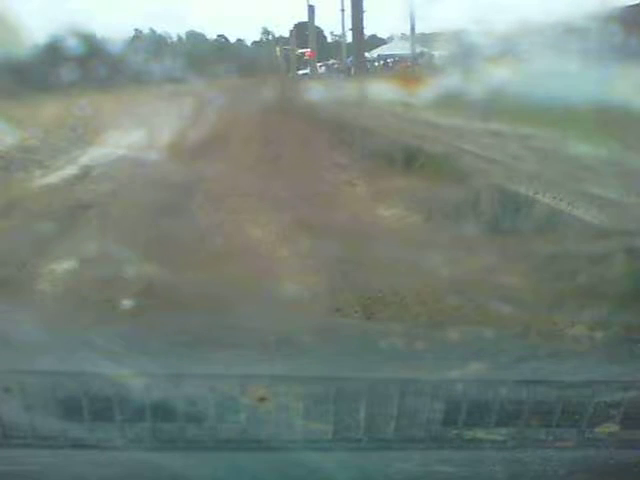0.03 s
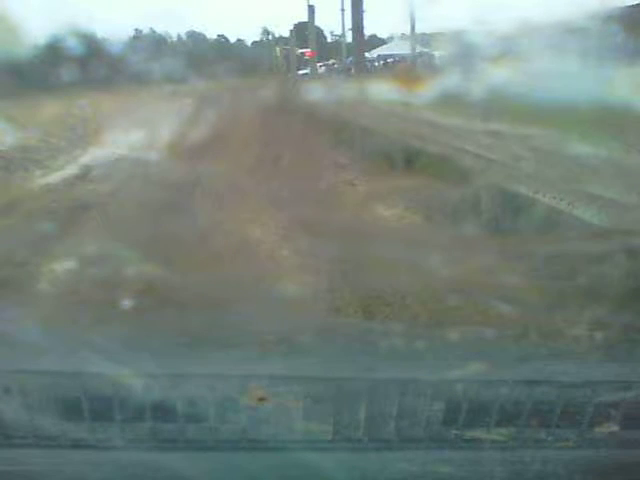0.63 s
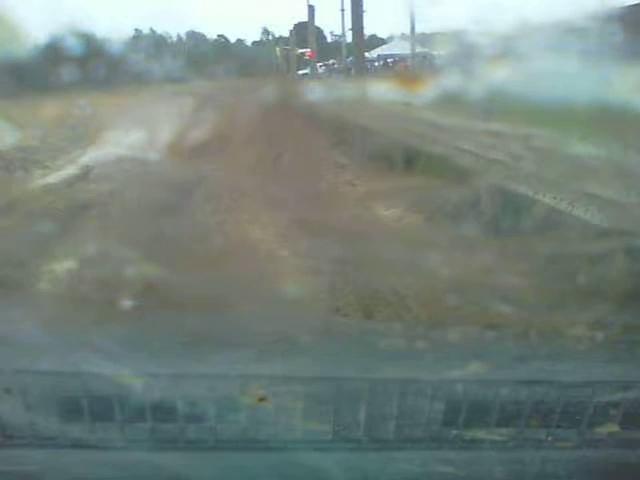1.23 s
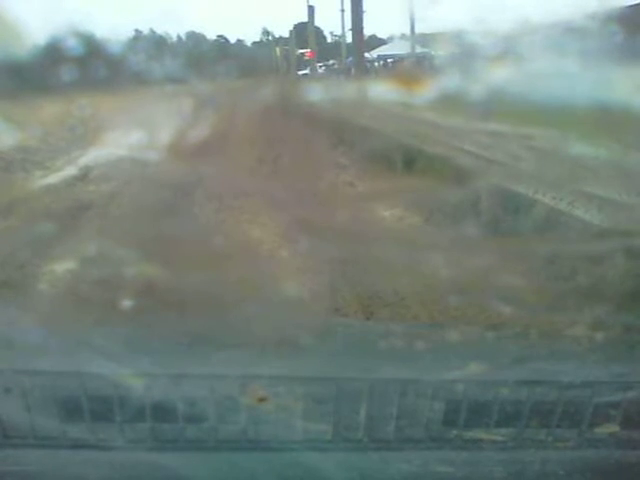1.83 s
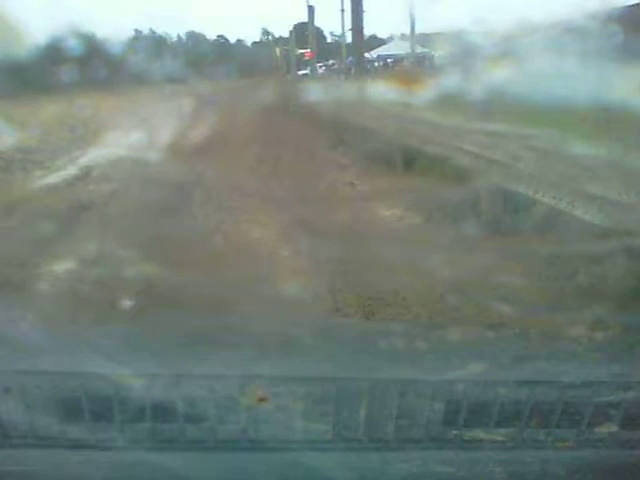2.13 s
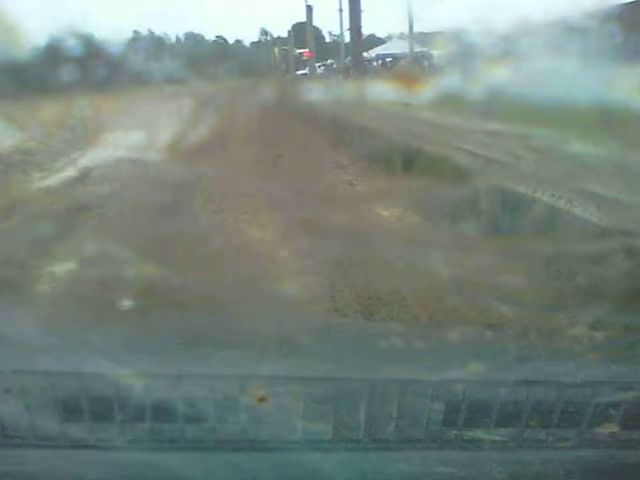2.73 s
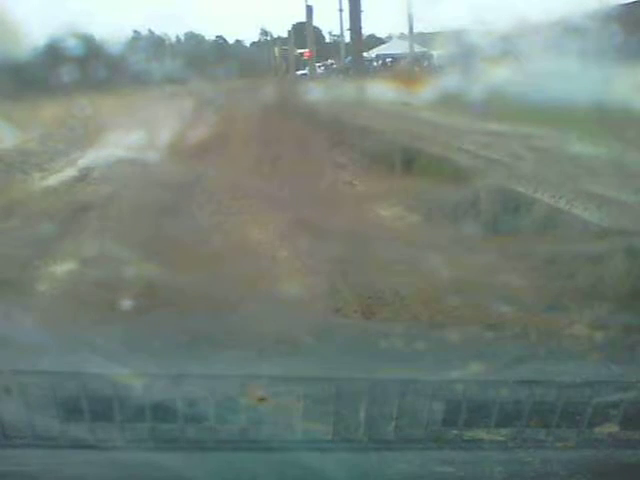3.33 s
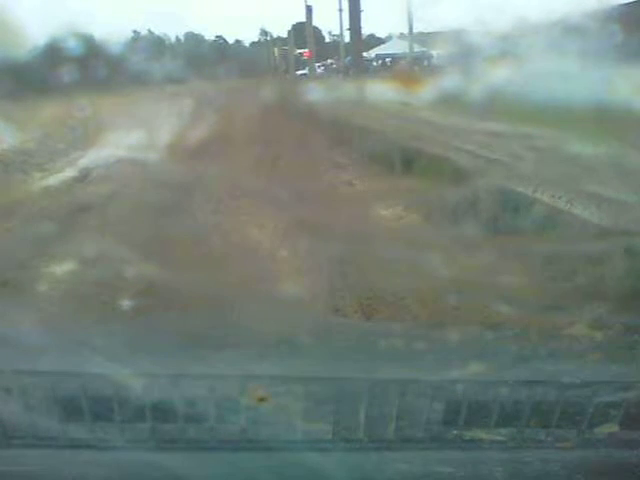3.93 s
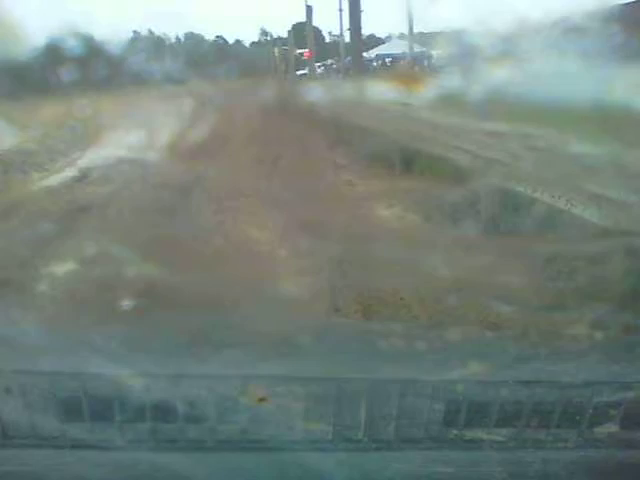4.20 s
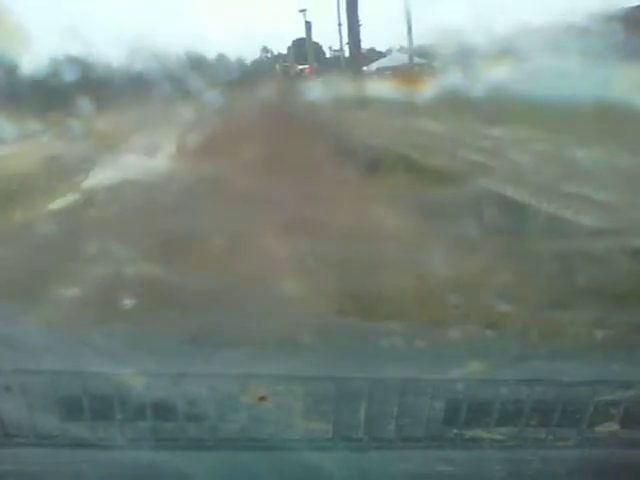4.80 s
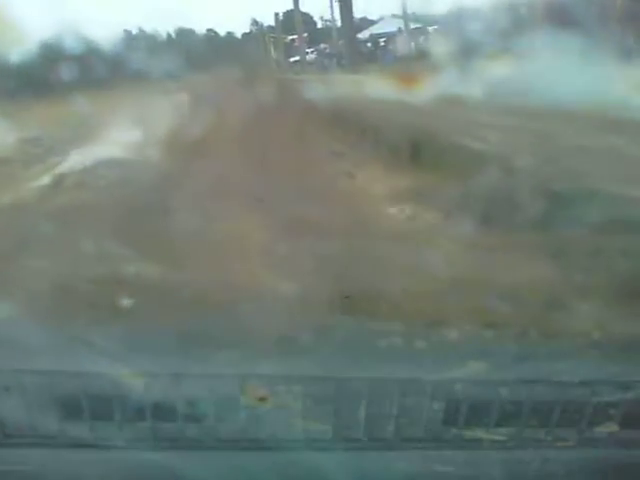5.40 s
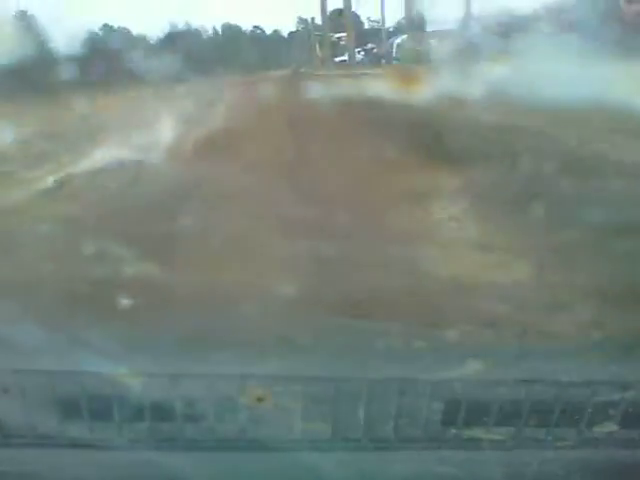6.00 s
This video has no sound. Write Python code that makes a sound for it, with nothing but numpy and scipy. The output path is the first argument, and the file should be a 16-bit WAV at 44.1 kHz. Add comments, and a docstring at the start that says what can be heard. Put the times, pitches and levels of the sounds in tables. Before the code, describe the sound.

From the start, a loud engine throbs inside a car, with a deep boom, clatter and a little hiss, heard through a small, dull-sounding dashboard microphone. Something scuffs the camera's housing at about 1 second. Around 1.3 seconds a quick cluster of hard knocks hits it, clipping and cracking; this is the loudest moment. At 1.4 seconds the roar stops dead, leaving a brief low shudder.

Until about 4.5 seconds there is only a very quiet idle hum and low rumble, with a barely audible electronic whine and hiss. Between 4.4 and 4.8 seconds the interior trim ticks and creaks softly as the car pulls away. Engine growl and gear tones climb in pitch, swelling near 5.4 seconds, while tyre rumble and a light spray of mud grow louder and brighter until the end at about 6 seconds, staying well below the opening roar.

```python
"""Inside a car on a muddy track, a small dashboard camera hears the engine's orders throb in the cabin
until knocks excite the modes of its housing and overload its input. The sound cuts off; a faint idle
hum and the camera's own electronic whine remain. The car then pulls away: drive-line tones climb with
shaft speed through the cabin's resonances, the trim ticks and the tyres rumble louder and brighter."""
import sys
import numpy as np
from scipy.fft import rfft, irfft, next_fast_len
from scipy.io import wavfile
from scipy.ndimage import map_coordinates

SR = 44100
rng = np.random.default_rng(int(sys.argv[2]) if len(sys.argv) > 2 else 0)


def store_pcm(level_fs):
    """Save levels as 16-bit WAV."""
    pcm = np.round(np.clip(level_fs, -1, 1) * 32767).astype(np.int16)
    wavfile.write(sys.argv[1], SR, np.atleast_2d(pcm).T)


N = 271215
TIME = np.arange(N) / SR

# Noise spectra, each giving a shape only: frequency_hz, relative_density_db
CIRCUIT_SPECTRUM = [(100, -18.5), (300, 0.5), (600, -0.5), (1000, -1.5), (2000, -1), (3200, -1.5),
                    (4500, -1.5), (5300, -5.5), (6000, -11), (7000, -51.5)]
RUMBLE_SPECTRUM = [(10, -8.5), (22, 1.5), (40, -3.5), (58, 2), (80, -5), (110, -10.5), (150, -16.5),
                   (220, -23.5), (400, -47), (900, -120)]
TYRE_SPECTRUM = [(30, -40), (80, -16), (140, 6), (220, -2), (330, 1), (450, -7), (620, -9), (850, -15.5),
                 (1300, -22), (2000, -34), (4000, -57.5), (7000, -100)]
SPRAY_SPECTRUM = [(200, -50), (600, -3), (1200, 1.5), (1600, -7), (2300, -6.5), (3000, -6.5), (4000, -19),
                  (5200, -18.5), (6500, -44)]
CABIN_SPECTRUM = [(12, -26.5), (35, -1), (65, 0.5), (105, -6.5), (150, -11.5), (200, -17.5), (300, -22),
                  (450, -40), (1200, -120)]
CLATTER_SPECTRUM = [(30, -60), (120, -21), (220, 2), (320, 2), (420, -2), (500, -6.5), (700, -6.5),
                    (870, -5.5), (1100, -12), (1400, -16.5), (1700, -18), (2200, -24.5), (4000, -37.5),
                    (7000, -77)]
ENGINE_HISS_SPECTRUM = [(300, -52), (900, -18.5), (2000, -5), (2550, 4), (3100, 2.5), (3800, -2.5),
                        (4600, -2.5), (5300, -6.5), (6000, -13.5), (8000, -70)]
# Tones of the camera's electronics: pitch_hz, level_db
WHINE_TONES = [(1200, -80), (1502, -86.5), (2202, -79), (4000, -87), (4048, -80), (4597, -83), (5426, -92)]
# Second harmonic of the idle hum: time_s, pitch_hz, level_db
IDLE_HUM = [(1.75, 183.1, -84), (2.13, 174.8, -95), (2.45, 180.3, -65), (2.69, 181.5, -69),
            (2.81, 177.9, -65), (2.94, 172.8, -78), (3.39, 183.9, -71), (3.88, 179.6, -71),
            (4.45, 183.5, -64)]
# Vibration of the idling body: time_s, pitch_hz, level_db
BODY_SHAKE = [(1.7, 46.3, -64), (2.07, 46.5, -60), (2.42, 61.3, -63), (3.17, 54.2, -72), (3.2, 54.7, -60),
              (3.96, 54.1, -55), (4.25, 60.7, -67), (4.5, 61.3, -55)]
# Ticks and creaks of the trim: start_s, level_db, pitch_hz, width_hz, t60_s
TRIM_TICKS = [(1.378, -58, 400, 900, .2), (4.415, -62, 1870, 1800, .2), (4.446, -55.5, 1300, 5000, 0.064),
              (4.45, -62, 430, 400, .12), (4.5, -54, 3690, 299, 0.041), (4.522, -52, 240, 120, .14),
              (4.575, -59, 3005, 5000, .04), (4.659, -57, 1790, 6010, 0.068), (4.77, -52, 1100, 600, .13),
              (4.788, -52.5, 1490, 160, .13), (4.804, -53, 1900, 3000, 0.06)]
# Shaft speed as the car pulls away: time_s, rotation_hz
SHAFT_SPEED = [(4.5, 26), (4.57, 27.6), (4.77, 40.1), (5.0, 47.2), (5.44, 61.1), (5.68, 73.5), (6.0, 93),
               (6.15, 102)]
# Shaft and gear tones: shaft_multiple, base_level_db, growth_db_per_hz
GEAR_ORDERS = [(1, -51.3, .07), (2, -59, -.02), (2.5, -62, .02), (3, -56.5, -.03), (4.8, -63, .15),
               (6.66, -67.3, .13)]
# Cabin resonances that lift a passing tone: centre_hz, width_hz, lift_db
CABIN_MODES = [(60, 14, 4), (78, 14, 6), (116, 12, 6), (141, 16, 8), (290, 60, 5), (620, 80, 6.5)]
# Tones of the loud engine: crank_multiple, relative_level_db
CRANK_ORDERS = [(1, -10), (2, 0), (3.17, -5.5), (4, -5.5), (4.6, -11.5), (6, -19), (7, -18), (8, -21),
                (12, -26), (14, -27)]
# Engine-bay resonances, a rasp and a honk: centre_hz, width_hz, rest_db, swell_db, peak_s, half_width_s
BAY_RESONANCES = [(1750, 500, -64, -46.8, .51, .25), (860, 260, -54.5, -51, 1.0, .22)]
# Modes of the camera's housing: pitch_hz, gain_db, t60_s
HOUSING_MODES = [(12.5, 0, .17), (40, 1.3, .115), (62, 3, .055), (165, 1, .09), (300, -5, .055),
                 (420, .5, .05)]
# Scuffs on the housing: start_s, level_db, t60_s
HOUSING_SCUFFS = [(.102, -38, 0.13), (0.397, -35.5, 0.027), (.9705, -22, 0.066), (1.1, -40.5, 0.1),
                  (1.161, -42, 0.2), (1.2, -41, .2), (1.228, -14.5, 0.082), (1.274, -10.5, 0.16),
                  (1.321, -26.5, 0.077), (1.351, -29, .056)]
# Knocks on the housing: start_s, strength_db, contact_hz
HOUSING_KNOCKS = [(1.248, 5, 10), (1.2733, 13, 227), (1.2944, 4.5, 85), (1.312, 9, 42), (1.335, 5.5, 15),
                  (1.357, 1, 44)]
# Jumps of the overloaded input: start_s, jump_db
OVERLOAD_CRACKS = [(1.2722, -7), (1.278, 1), (1.2784, 0.5), (1.2787, 3), (1.2905, -19), (1.2969, 0.5),
                   (1.2975, 0), (1.2995, 0), (1.3224, 2)]
# Treble response of the overloaded input: frequency_hz, gain_db
OVERLOAD_TREBLE = [(5500, 0), (8000, -4.5), (10500, -.5), (13000, -2)]

DROPOUT_START_S, DROPOUT_END_S, CUT_S = 1.306, 1.3175, 1.3705
CRANK_HZ = 22.77
REFERENCE_HZ = 60  # shaft speed at which the moving car's base levels hold
STRAIN = dict(peak_s=5.37, half_width_s=.13, height=3.5)  # dB swell of the drive tones and rumble
SLUSH = dict(peak_s=5.72, half_width_s=.11, height=2.2)  # dB surge of the tyres in softer mud


def amp(db):
    """Amplitude ratio of a level in decibels."""
    return 10 ** (np.asarray(db) / 20)


def unit(x):
    """Normalisation to rms 1."""
    return x / np.sqrt(np.mean(x ** 2) + 1e-20)


def curves(rows):
    """Linear interpolation of each column over the times in the first."""
    times, *columns = np.transpose(rows)
    return [np.interp(TIME, times, column) for column in columns]


def wobble(knots_per_s):
    """Slow random modulation: a spline through Gaussian values."""
    return map_coordinates(rng.standard_normal(int(N * knots_per_s / SR) + 4), [TIME * knots_per_s])


def swell(peak_s, half_width_s, height):
    """A Gaussian bump in time."""
    return height * np.exp(-((TIME - peak_s) / half_width_s) ** 2)


def ramp(start_s, rise_s):
    """A linear rise from 0 to 1."""
    return np.clip((TIME - start_s) / rise_s, 0, 1)


def gate(start_s, end_s, fade_s):
    """A time window with linear edges."""
    return ramp(start_s, fade_s) * np.clip((end_s - TIME) / fade_s, 0, 1)


def decay(t60_s, attack_s):
    """Exponential damping after a quick rise, a third of a second in all."""
    t = TIME[:SR // 3]
    return np.exp(-np.log(1000) * t / t60_s) * (1 - np.exp(-t / attack_s))


def filtered(x, response):
    """Linear filtering: the spectrum of x times a frequency response."""
    size = next_fast_len(len(x) + 8192)
    return irfft(rfft(x, size) * response(np.fft.rfftfreq(size, 1 / SR)), size)[:len(x)]


def noise(spectrum):
    """White noise shaped by (frequency_hz, relative_density_db) points, at rms 1."""
    hz, db = np.transpose(spectrum)
    white = rng.standard_normal(N)
    return unit(filtered(white, lambda f: amp(np.interp(np.log(f + 1), np.log(hz), db))))


def resonant_noise(hz, width_hz, size=N):
    """Noise through two like resonators in cascade, at rms 1."""
    white = rng.standard_normal(size)
    return unit(filtered(white, lambda f: (1j * f * width_hz / (hz**2 - f**2 + 1j * f * width_hz)) ** 2))


def phase(hz):
    """Phase as the integral of frequency, from a random start."""
    return 2 * np.pi * (np.cumsum(hz) / SR + rng.random())


def partial(angle):
    """A sinusoid with a random phase offset."""
    return np.sin(angle + 2 * np.pi * rng.random())


def add(track, start_s, sound):
    """Superposition of a sound on a track."""
    part = track[round(start_s * SR):][:len(sound)]
    part += sound[:len(part)]


def rolling_gain(shaft_hz, db, db_per_hz):
    """A gain that opens as the car rolls off, its level linear in shaft speed."""
    return ramp(start_s=4.4, rise_s=.2) * amp(db + db_per_hz * (shaft_hz - REFERENCE_HZ))


def electronics():
    """Circuit noise and thin, steady tones form the camera's noise floor."""
    whine = sum(amp(db) * np.sin(phase(hz + .44 * wobble(7.7))) for hz, db in WHINE_TONES)
    return np.sqrt(2) * whine + amp(-70) * noise(CIRCUIT_SPECTRUM)


def idle_rumble():
    """Structure-borne noise of the standing car, rising a little as the idle firms up."""
    softness = 1 - ramp(start_s=2.15, rise_s=.3)
    unsteady = wobble(18)
    rumble = amp(-59.5 - 4 * softness + 1.1 * unsteady) * noise(RUMBLE_SPECTRUM)
    wash = amp(-74 - 9 * softness + 1.4 * unsteady) * noise(TYRE_SPECTRUM)
    return rumble + wash


def faint_idle():
    """Forced vibration at idle: three harmonics, the fundamental swelling with the body's shake."""
    second_hz, second_db = curves(IDLE_HUM)
    shake_hz, shake_db = curves(BODY_SHAKE)
    cycle = phase(second_hz / 2 * (1 + .0037 * wobble(12)))
    hum = amp(shake_db - 8) * np.sin(cycle) + amp(second_db) * np.sin(2 * cycle)
    hum += amp(second_db - 11 + 2.5 * wobble(4)) * np.sin(3 * cycle)
    shake = amp(shake_db + 2 * wobble(12)) * np.sin(phase(shake_hz))
    return np.sqrt(2) * (hum + shake) * gate(1.41, 4.55, fade_s=.087)


def settling(sway_t60_s=.95, shudder_t60_s=.28):
    """Two-slope decay after the cut: a deep sway outlasts a brief shudder."""
    age_s = np.maximum(TIME - CUT_S, 0)
    sway = noise([(8, -21.5), (21, 1.5), (32, -5), (50, -12), (100, -28), (300, -60), (2000, -120)])
    shudder = noise([(15, -20), (45, 0), (100, -8), (180, -18), (350, -34), (900, -60), (2000, -120)])
    return amp(-42 - 60 * age_s / sway_t60_s) * sway + amp(-37 - 60 * age_s / shudder_t60_s) * shudder


def trim():
    """Damped resonances of loose trim: a rattle after the knocks, ticks and creaks on moving off."""
    out = np.zeros(N)
    for start_s, db, hz, width_hz, t60_s in TRIM_TICKS:
        envelope = amp(db) * decay(t60_s, attack_s=.0017)
        add(out, start_s, envelope * resonant_noise(hz, width_hz, len(envelope)))
    return out


def muddy_track():
    """Rolling noise: body rumble, tyre roar and mud spray grow with speed; ruts jolt the first two."""
    shaft_hz, = curves(SHAFT_SPEED)
    ruts = wobble(18)
    strain_db, slush_db = swell(**STRAIN), swell(**SLUSH)
    rumble = rolling_gain(shaft_hz, -44.6 + strain_db + 1.1 * ruts, .15) * noise(RUMBLE_SPECTRUM)
    tyres = rolling_gain(shaft_hz, -55.5 + slush_db + 1.6 * ruts, .18) * noise(TYRE_SPECTRUM)
    spray = rolling_gain(shaft_hz, -65.2 + slush_db + wobble(60), .29) * noise(SPRAY_SPECTRUM)
    return rumble + tyres + spray


def growl(resonance_hz=565, full_load_hz=72):
    """Rough half-orders of the engine sweep through a broad cabin resonance, growing up to full load."""
    shaft_hz, = curves(SHAFT_SPEED)
    shaft = phase(shaft_hz)
    out = np.zeros(N)
    for order in np.arange(6, 26) / 2:
        response = 1 / (1 + (np.log(order * shaft_hz / resonance_hz) / .33) ** 2)
        out += response * amp(3.2 * wobble(13)) * partial(order * shaft + .75 * wobble(25))
    return rolling_gain(np.minimum(shaft_hz, full_load_hz), -65.3, db_per_hz=.65) * out / 2


def drive_line():
    """Shaft and gear orders climb together, each amplified by resonance as it crosses a cabin mode."""
    shaft_hz, = curves(SHAFT_SPEED)
    shaft = phase(shaft_hz * (1 + .007 * wobble(14)))
    out = np.zeros(N)
    for order, base_db, db_per_hz in GEAR_ORDERS:
        lift_db = sum(peak_db / (1 + (2 * (order * shaft_hz - centre_hz) / width_hz) ** 2)
                      for centre_hz, width_hz, peak_db in CABIN_MODES)
        level_db = base_db + lift_db + swell(**STRAIN) + 2.7 * wobble(14)
        out += rolling_gain(shaft_hz, level_db, db_per_hz) * partial(order * shaft)
    return np.sqrt(2) * out


def cabin_drone(pitch_hz=121, sag_hz_per_s=52, hold_s=.135, fade_db_per_s=300):
    """A cabin boom sags in pitch, holding its level briefly before an exponential decay."""
    level_db = -17.7 - fade_db_per_s * np.maximum(TIME - hold_s, 0)
    return amp(level_db) * np.sin(phase(pitch_hz - sag_hz_per_s * TIME))


def loud_engine():
    """Uneven crank orders boom in the cabin; the firings amplitude-modulate the clatter and hiss."""
    crank = phase(CRANK_HZ * (1 + .008 * wobble(9)))
    orders = sum(amp(db + 3.1 * wobble(14)) * partial(order * crank + .2 * wobble(16))
                 for order, db in CRANK_ORDERS)
    boom = amp(-18.8) * unit(orders) + amp(-26.2) * noise(CABIN_SPECTRUM)
    firing = unit(1 + .13 * np.cos(2 * crank) + .065 * np.cos(crank))
    clatter = amp(-37.6 + wobble(40)) * noise(CLATTER_SPECTRUM)
    hiss = amp(-49.5 - 2.4 * TIME + 1.1 * wobble(55)) * noise(ENGINE_HISS_SPECTRUM)
    bay = sum((amp(rest_db) + swell(peak_s, half_width_s, amp(swell_db))) * resonant_noise(hz, width_hz)
              for hz, width_hz, rest_db, swell_db, peak_s, half_width_s in BAY_RESONANCES)
    valves = amp(-60) * resonant_noise(4600, width_hz=500)
    return boom + cabin_drone() + firing * (clatter + hiss + bay + valves)


def scuffs():
    """Friction on the camera's shell makes short bursts of broadband noise."""
    envelope = np.zeros(N)
    for start_s, db, t60_s in HOUSING_SCUFFS:
        add(envelope, start_s, amp(db) * decay(t60_s, attack_s=.0015))
    return envelope * noise([(50, -29), (200, -14), (750, 2.5), (1500, 2.5), (2300, -3),
                             (3600, 1), (5000, -6), (6000, -9.5), (8000, -59)])


def knocks(reach_octaves=1.1):
    """Impact excites the housing's damped modes: a soft contact the low ones, a hard contact the high."""
    out = np.zeros(N)
    for start_s, strength_db, contact_hz in HOUSING_KNOCKS:
        for hz, mode_db, t60_s in HOUSING_MODES:
            excitation = np.exp(-(np.log2(hz / contact_hz) / reach_octaves) ** 2)
            ring = decay(t60_s, attack_s=.00033) * np.sin(2 * np.pi * hz * TIME[:SR // 3])
            add(out, start_s, -excitation * amp(strength_db + mode_db) * ring)
    return out


def overload_cracks(x, rail):
    """An overloaded signal jumps toward its other rail and relaxes in about a millisecond."""
    out = x.copy()
    for start_s, jump_db in OVERLOAD_CRACKS:
        polarity = -np.sign(out[round(start_s * SR)])
        add(out, start_s, polarity * amp(jump_db) * decay(t60_s=.008, attack_s=.00002))
        out = np.clip(out, -rail - .02, rail + .018)
    return out


def scene():
    """Sources superpose over the noise floor; the loud ones stop dead and the quiet ones take over."""
    dropout = gate(DROPOUT_START_S, DROPOUT_END_S, fade_s=.0005)
    loud = (loud_engine() + scuffs() + knocks()) * (1 - dropout)
    quiet = settling() + faint_idle() + idle_rumble() + drive_line() + growl() + muddy_track() + trim()
    return (np.where(TIME < CUT_S, loud, quiet) + electronics())[None]


def record(dry):
    """Saturation in a narrow-band input stage, which clips, cracks and rests slightly off zero."""
    rail, offset = .7, -.02
    band_hz, rolloff_hz, top_hz = 5600, 11500, 16500
    clipped = np.clip(dry[0], -rail, rail)
    narrow = filtered(clipped, lambda hz: 1 / np.sqrt(1 + (hz / band_hz) ** 60))
    cracked = overload_cracks(narrow, rail)
    coloured = filtered(cracked, lambda hz: amp(np.interp(hz, *np.transpose(OVERLOAD_TREBLE))))
    softened = filtered(coloured,
                        lambda hz: 1 / np.sqrt((1 + (hz / rolloff_hz) ** 10) * (1 + (hz / top_hz) ** 120)))
    return softened[None] + offset


dry = scene()
out = record(dry)
store_pcm(out)
```